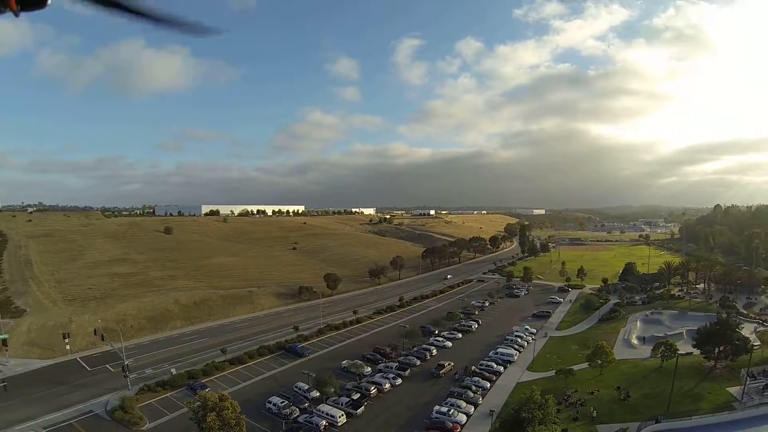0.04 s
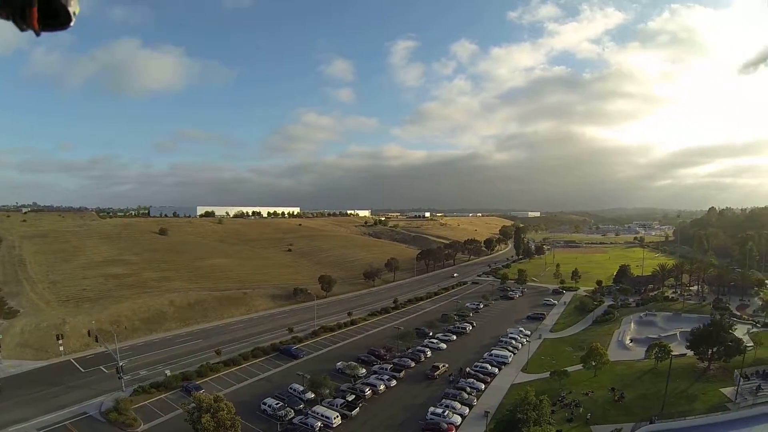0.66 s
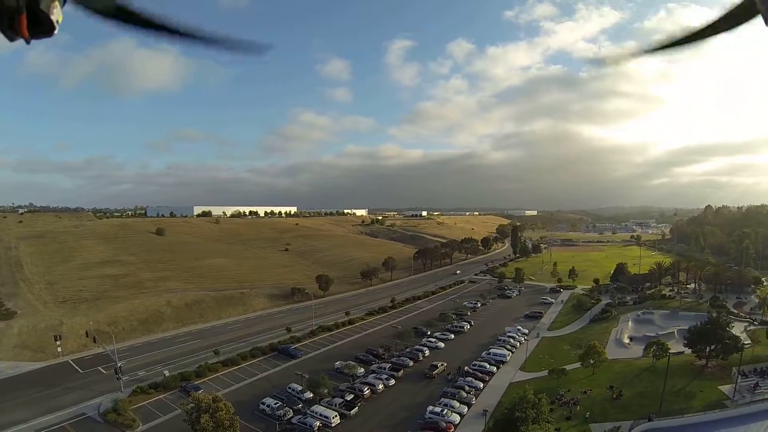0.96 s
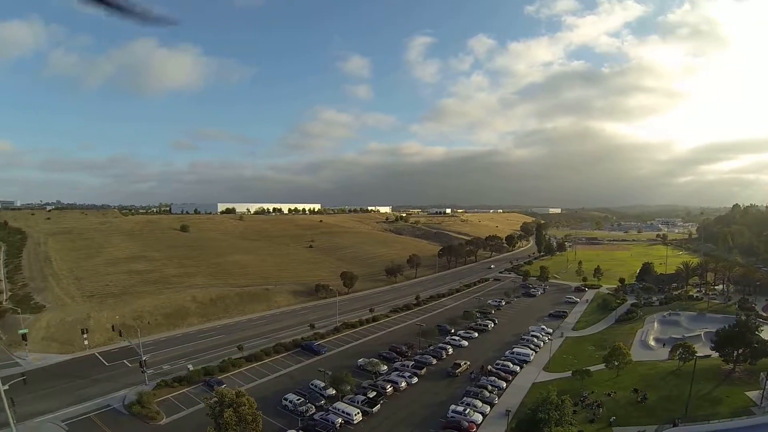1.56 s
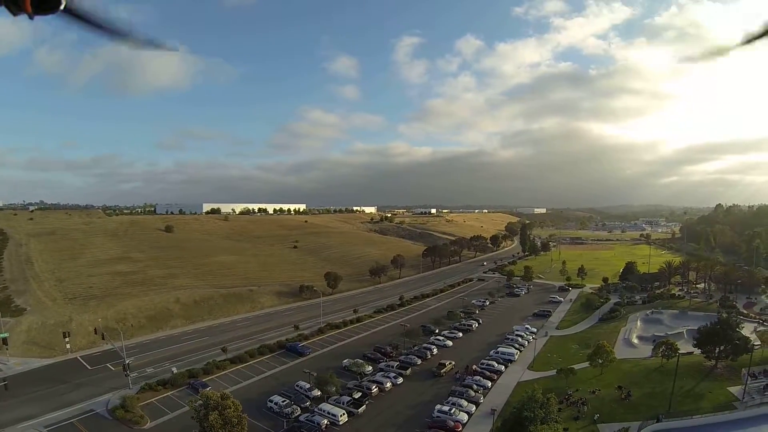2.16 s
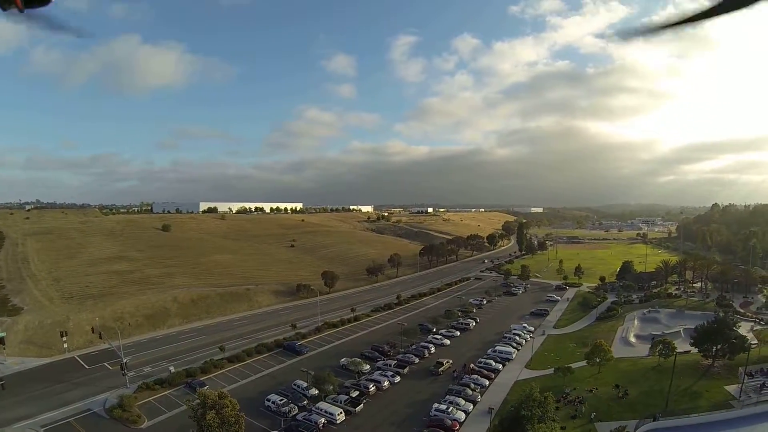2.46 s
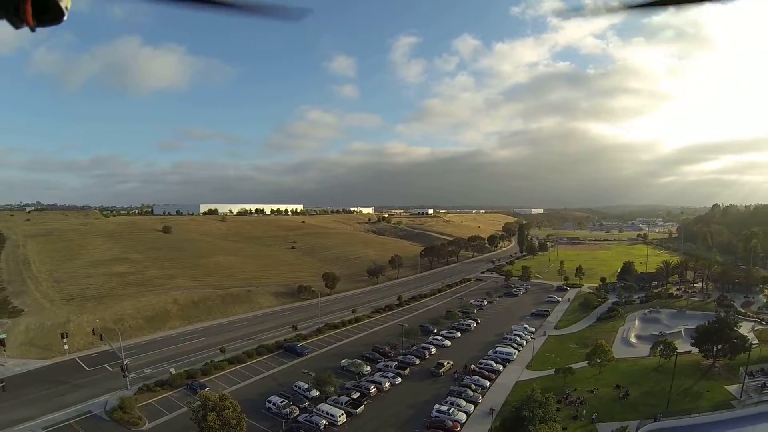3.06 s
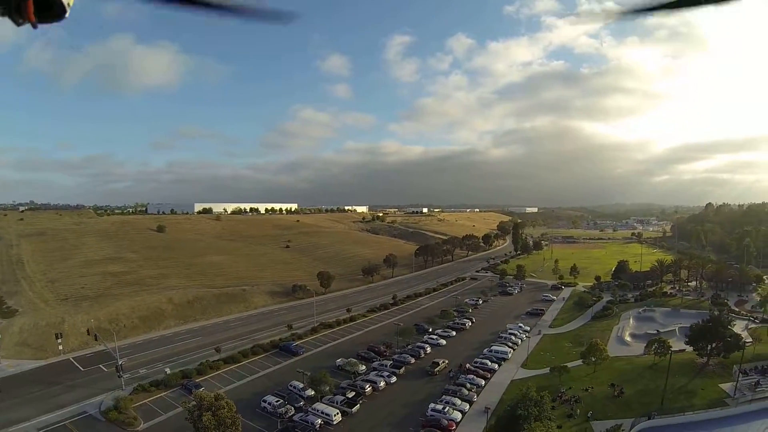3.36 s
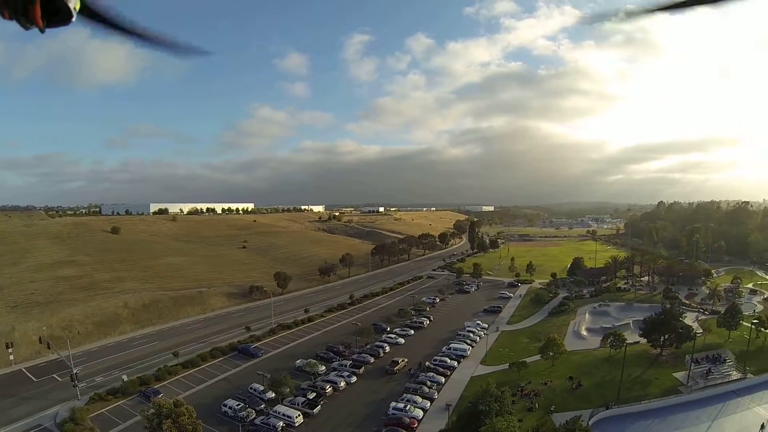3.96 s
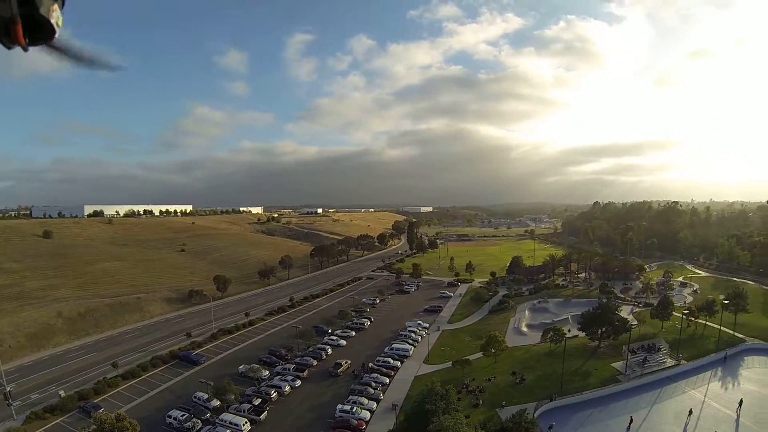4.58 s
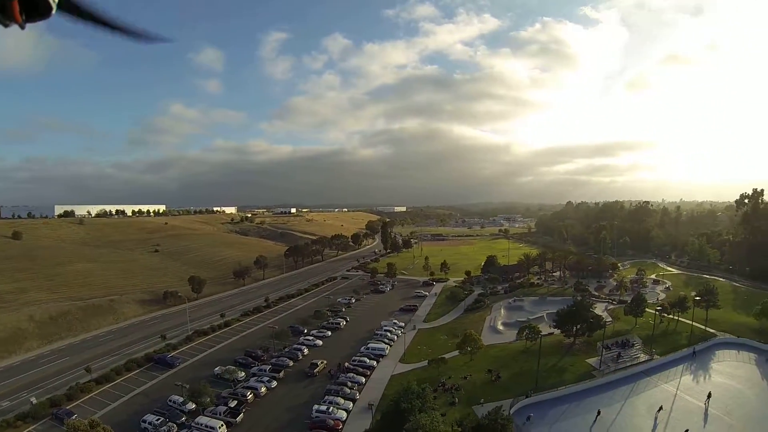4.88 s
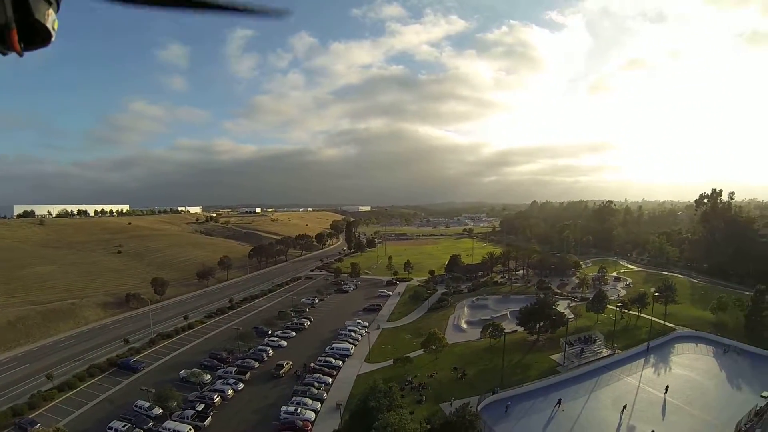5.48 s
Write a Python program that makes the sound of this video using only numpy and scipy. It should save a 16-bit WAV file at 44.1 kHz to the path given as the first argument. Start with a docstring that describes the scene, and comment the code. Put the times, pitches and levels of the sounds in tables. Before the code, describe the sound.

Several drone propellers buzz and chop the air right above the microphone, in the open air, topped by a high electric whine and fine hiss. The hum wavers, with occasional small motor squeaks and short rattling bursts from the blades. After about three seconds the motors strain and the propeller pitches pull apart. A soft breeze rumbles underneath and swells into a gust near the end.

```python
"""A large multirotor drone hovers over a park, heard from a camera slung under its frame.
From the start six two-bladed propellers thrum and beat, chopping the air into a swish that swells
when rough air drags them down. The speed controllers make the windings whine near 8 and 9.5 kHz.
Now and then a motor squeaks, blades slap through a wake and gusts brush the microphone. At 3.2 s a turn
pulls the nearest two propellers' speeds apart and strains the motors; the strongest gust comes last."""
import sys
import numpy as np
from scipy.fft import rfft, irfft, next_fast_len
from scipy.io import wavfile
from scipy.ndimage import map_coordinates

SR = 44100
rng = np.random.default_rng(int(sys.argv[2]) if len(sys.argv) > 2 else 0)


def wrap_up_sound(samples):
    """Save the sound to the file named by the first command line argument, as 16-bit audio."""
    columns = np.atleast_2d(samples).T
    # keep every value between -1 and 1, then stretch to whole-number steps
    tamed = np.clip(columns, -1, 1)
    steps = np.round(tamed * 32767).astype(np.int16)
    wavfile.write(sys.argv[1], SR, steps)


N = 243873
TIME = np.arange(N) / SR
SWITCH_HZ, POLE_PAIRS = 7961, 14  # the controllers' switching tone; magnet pairs per motor


def amp(db):
    """Decibels to gain."""
    return 10 ** (np.asarray(db) / 20)


def unit(x):
    """Scale to rms 1."""
    return x / np.sqrt(np.mean(x ** 2) + 1e-20)


def curves(rows):
    """One automation curve for each column after the time."""
    times, *columns = np.transpose(rows)
    return [np.interp(TIME, times, column) for column in columns]


def spells(rows):
    """A gain that swells and fades for every row of middle_s, length_s, level_db."""
    return sum(amp(db) * np.exp(-(2 * (TIME - s) / length) ** 4) for s, length, db in rows)


def noise():
    """White noise."""
    return rng.standard_normal(N)


def wobble(rate):
    """A smooth random curve, rate knots a second."""
    knots = rng.standard_normal(int(N * rate / SR) + 4)
    return map_coordinates(knots, [TIME * rate], mode="nearest")


def filtered(x, response):
    """Filter x by a gain that is a function of frequency."""
    size = next_fast_len(N + 8192)
    return irfft(rfft(x, size) * response(np.fft.rfftfreq(size, 1 / SR)), size)[:N]


def eq(x, points):
    """Equalise x through points of freq_hz, gain_db on a log axis."""
    freq_hz, gain_db = np.transpose(points)
    return filtered(x, lambda hz: amp(np.interp(np.log(hz + 1), np.log(freq_hz), gain_db)))


def coloured(x, points):
    """Equalise, then scale to rms 1."""
    return unit(eq(x, points))


def angle(hz):
    """The running phase of a rate curve."""
    return 2 * np.pi * np.cumsum(hz) / SR


def gate(blade, focus):
    """A swell at every blade pass, at rms 1; more focus makes it shorter."""
    return unit(np.exp(focus * (np.cos(blade) - 1)))


def load_bursts(blade, focus, lopsided):
    """One burst as each blade loads the motor, one blade harder than the other."""
    load = blade - .9
    return unit(gate(load, focus) * (1 - lopsided * np.cos(load / 2)))


# Low rumble of wind on the microphone: freq_hz, gain_db
WIND_EQ = [(8, -7), (22, -1), (45, -6.5), (90, -12), (250, -35), (700, -36.5)]
# Gusts: middle_s, length_s, level_db
GUSTS = [(.3, 0.19, -40), (1.5, .15, -36), (2.86, .09, -38), (3.04, .13, -35), (5.11, .09, -32),
         (5.33, .26, -28.5)]
def wind():
    """A light breeze and stronger gusts buffet the microphone."""
    breeze_db = -35.5
    return (amp(breeze_db) + spells(GUSTS)) * amp(1.8 * wobble(7)) * coloured(noise(), WIND_EQ)


# Motor squeaks: middle_s, length_s, level_db
SQUEAKS = [(.35, 0.059, -37), (.635, .09, -35), (.77, .04, -38), (0.918, 0.056, -35), (.985, 0.044, -30),
           (1.24, 0.12, -40), (2.3, .12, -43), (2.79, 0.045, -39.5), (3.04, .08, -39.5), (3.134, .08, -37),
           (3.42, .15, -44), (4.25, 0.08, -31.5), (4.572, 0.062, -39), (4.926, 0.069, -36.5)]
def motor_squeak(blade):
    """A narrow motor resonance sings faintly all along and squeaks in spells, chattering as it spins."""
    pitch_hz, faint_db = 3458, -48
    chatter = load_bursts(blade, focus=.9, lopsided=.45) * amp(2.5 * wobble(60))
    tone = np.sin(angle(pitch_hz + 24 * wobble(120)))
    return (spells(SQUEAKS) + amp(faint_db + 2.4 * wobble(10))) * unit(tone * chatter)


def overtone(blade, throb):
    """The magnets shift the switching tone up by twice the electrical rate; uneven commutation smears it."""
    phase = 2 * np.pi * SWITCH_HZ * TIME + POLE_PAIRS * blade
    smear = angle(20 * wobble(45)) + .75 * wobble(500)
    return unit(np.sin(phase + smear) * gate(blade - .9, throb) * amp(2.6 * wobble(40)))


# Fader ride on the motors' overtone whine: time_s, level_db
WHINE_FADER = [(0, -23.9), (0.52, -21.1), (0.75, -24.4), (1.3, -21.9), (1.65, -24.6), (2.0, -23.2),
               (3.65, -25.0), (3.87, -22.6), (4.3, -24.9), (5.53, -26.5)]
def overtone_whine(first, second, far):
    """Five motors whine together; the fastest far motor adds no whine."""
    near_pair = 1.22 * overtone(first, throb=.76) + .69 * overtone(second, throb=.52)
    distant = .62 * sum(overtone(blade, throb=.49) for blade in far[:-1])
    return amp(curves(WHINE_FADER)[0]) * unit(near_pair + distant)


# Ring of the motor bell: freq_hz, gain_db
BELL_EQ = [(7400, -26), (7830, -10), (7960, -4), (8080, 2.5), (8260, 4), (8600, 17), (8850, -11),
           (9600, -25)]
# Dry rasp of the motor: freq_hz, gain_db
RASP_EQ = [(5800, -50), (6450, -11.5), (6820, -1), (7100, -13.5), (7650, -7), (8050, 4), (8600, 0),
           (8850, -4), (9300, 0.5), (10200, -9), (10800, -23), (12000, -45)]
def near_motor(blade, strain):
    """The switching tone rings the motor bell in bursts, shorter and stronger under strain, over a rasp."""
    bursts = load_bursts(blade, focus=1.5 + 6 * strain, lopsided=.5 * strain) * amp(1.2 * wobble(60))
    pull = -.55 * strain * np.cos(blade / 2)  # uneven load bends the tone once a revolution
    tone = np.sqrt(2) * np.sin(2 * np.pi * SWITCH_HZ * TIME + pull)
    ring = amp(-6 + 4 * strain) * coloured(tone * (bursts + .06), BELL_EQ)
    scrape = load_bursts(blade, focus=.16 + .18 * strain, lopsided=.17 * strain)
    rasp = amp(1.04 - 2.4 * strain) * coloured(noise() * scrape * amp(1.87 * wobble(50)), RASP_EQ)
    return amp(-27 + 5.6 * strain) * (ring + rasp)


# Airy top of the blade tips: freq_hz, gain_db
HISS_EQ = [(9500, -12), (10900, -12), (11800, -0.5), (12600, 0.5), (14000, -2.5), (15300, -14)]
# Fader ride on the hiss: time_s, level_db
HISS_FADER = [(0, -29.5), (0.3, -30.6), (1.0, -30.0), (1.4, -28.1), (2.3, -30.0), (2.58, -28.1),
              (2.85, -30.7), (3.8, -29.1), (4.25, -29.9), (4.6, -29.1), (5.0, -30.0), (5.3, -27.9),
              (5.53, -28.5)]
def tip_hiss(blade):
    """Fine hiss from the nearest blade tips, flickering twice per pass."""
    flicker = gate(2 * blade - 1.8, focus=.2) * amp(1.3 * wobble(70))
    hiss = coloured(noise() * gate(blade - .9, focus=.11) * flicker, HISS_EQ)
    return amp(curves(HISS_FADER)[0]) * hiss


def slap(blade):
    """A blade that cuts through a wake gives a short, hard knock."""
    knocks = -gate(blade + .07 * wobble(110), focus=30) * amp(1.8 * wobble(60))
    return coloured(knocks, [(110, -16), (220, -20), (320, 1), (430, 5), (650, -2.5), (1300, 6)])


# Spells of blades cutting through each other's wake: middle_s, length_s, level_db
WAKES = [(.13, 0.2, -35), (1.38, 0.27, -31.5), (1.61, 0.17, -31.5), (1.95, 0.5, -40), (2.35, 0.11, -38),
         (2.58, 0.18, -31), (4.3, .14, -38), (4.57, 0.13, -34.5), (4.94, .12, -38)]
def wake_slaps(first, second):
    """The nearest two propellers knock in each wake, the second one harder."""
    return spells(WAKES) * unit(slap(second) + .41 * slap(first))


# Broad body of the swish: freq_hz, gain_db
SWISH_EQ = [(120, -14.5), (230, -0.5), (400, 1.5), (620, -1), (1100, -1.5), (2000, -5), (3500, -6.5),
            (5400, -10), (7500, -8), (10500, -11.5), (15000, -18)]
# Darker swish of a wake's large eddies: freq_hz, gain_db
WAKE_EQ = [(400, -3), (1200, 1), (5000, -7)]
# Swish fader: calm_db, drag_db_per_hz, turn_db_per_hz
SWISH_FADER = (-25.2, .17, -.033)
def blade_swish(first, second, far):
    """The blades shed turbulence in puffs as they sweep past, with an extra roar in a wake."""
    near_power = gate(first - .5, focus=.7) ** 2 + gate(second, focus=1.1) ** 2
    far_power = .6 * sum(gate(blade, focus=1.4) ** 2 for blade in far)
    chop = coloured(noise() * np.sqrt(near_power + far_power) * amp(.93 * wobble(45)), SWISH_EQ)
    roar = amp(-4.5) * spells(WAKES) * eq(chop, WAKE_EQ)
    return effort_gain(SWISH_FADER) * chop + roar


def thrum(blade, sharp, flutter_db):
    """Each passing blade pulls a dip of pressure; turbulent inflow varies its depth and sharpness."""
    harmonic_ratio = np.clip(sharp + .047 * wobble(30), 0, .8)
    spin = np.exp(1j * blade)
    dips = -np.sqrt(2) * np.real(spin / (1 - harmonic_ratio * spin))
    return dips * amp(flutter_db * wobble(25))


# Thrum faders for the nearest, second and far propellers: calm_db, drag_db_per_hz, turn_db_per_hz
FIRST_FADER = (-25.3, .1, .06)
SECOND_FADER = (-26.1, .15, -.09)
FAR_FADER = (-27.1, .2, 0)
# The blade's width rounds off its pulse: freq_hz, gain_db
BLADE_EQ = [(100, -0.5), (230, 1), (330, -1.5), (500, -1), (1000, -15)]
def propeller_thrum(first, second, far, strain):
    """Six propellers beat against each other; a harder-working blade pulls a sharper pulse."""
    hum = effort_gain(FIRST_FADER) * thrum(first, sharp=.36 + .2 * strain, flutter_db=1.67)
    hum += effort_gain(SECOND_FADER) * thrum(second, sharp=.15 + .15 * strain, flutter_db=3)
    far_gain = effort_gain(FAR_FADER) * amp(1.15 * wobble(4.98))
    hum += far_gain * unit(sum(thrum(blade, sharp=.24, flutter_db=1.6) for blade in far))
    return eq(hum, BLADE_EQ)


# Speed of the nearest propeller: time_s, blade_rate_hz
FIRST_SPEED = [(0, 108.2), (0.14, 106.9), (0.3, 108.3), (0.52, 110.0), (0.8, 111.5), (1.22, 109.1),
               (1.58, 105.8), (2.08, 108.0), (2.62, 105.7), (3.15, 112.4), (3.45, 116.7), (3.88, 120.0),
               (4.25, 113.9), (4.45, 115.8), (4.75, 116.9), (4.95, 112.6), (5.25, 120.9), (5.53, 119.8)]
# The turn, as the second propeller falls behind the nearest: time_s, slower_by_hz
TURN_GAP = [(3.2, 0), (3.36, 12), (4.1, 11.5), (4.55, 14), (4.72, 20.5), (5.03, 15), (5.53, 25)]
# Trims that slip the second propeller out of step and back in: middle_s, length_s, passes_lost
TRIMS = [(.21, .2, -.55), (.47, .32, -.45), (1.495, .52, 2), (2.25, .2, .16), (2.48, .14, -.16),
         (2.85, .62, 2)]
# Speeds of the four far propellers: blade_rate_hz
FAR_SPEEDS = [123.06, 126.95, 129.64, 137.75]
def blade_phases():
    """The nearest two propellers run in step but for trims and the turn; the far four waver."""
    first_hz, turn_hz = curves(FIRST_SPEED) + curves(TURN_GAP)
    trim_hz = sum(passes / length * (1 + np.cos(2 * np.pi * np.clip((TIME - s) / length, -.5, .5)))
                  for s, length, passes in TRIMS)
    far = [angle(hz + 2.5 * wobble(6)) for hz in FAR_SPEEDS]
    return angle(first_hz), angle(first_hz - turn_hz - trim_hz), far


def effort_gain(fader):
    """A layer's gain follows the drag of rough air on the rotors and the effort of the turn."""
    calm_db, drag_db_per_hz, turn_db_per_hz = fader
    hover_hz, turn_share = 108.87, .41  # calm blade rate; the nearest propeller's share of the gap
    first_hz, turn_hz = curves(FIRST_SPEED) + curves(TURN_GAP)
    drag_hz = hover_hz + turn_share * turn_hz - first_hz
    return amp(calm_db + drag_db_per_hz * drag_hz + turn_db_per_hz * turn_hz)


# Load on the near motors: time_s, strain_0_to_1
STRAIN = [(0.3, .42), (.7, .6), (2.9, .54), (3.6, .84), (4.6, .98), (4.95, .78), (5.53, .88)]
def scene():
    """Blades and motors ride the same six rotor phases, over the wind."""
    strain, = curves(STRAIN)
    first, second, far = blade_phases()
    blades = propeller_thrum(first, second, far, strain) + wake_slaps(first, second)
    air = blade_swish(first, second, far) + tip_hiss(first)
    motors = overtone_whine(first, second, far) + near_motor(first, strain) + motor_squeak(first)
    return (blades + air + motors + wind())[None]


def record(dry):
    """The camera's input sits on a small constant offset and keeps nothing above its band limit."""
    offset, top_hz = .093, 15400
    return filtered(dry[0], lambda hz: hz < top_hz)[None] + offset


dry = scene()
out = record(dry)
wrap_up_sound(out)
```